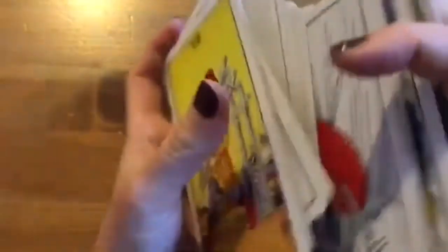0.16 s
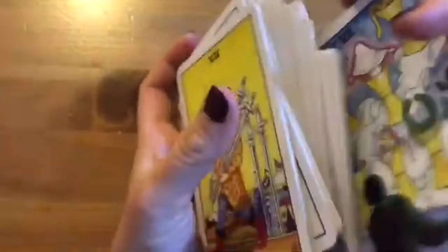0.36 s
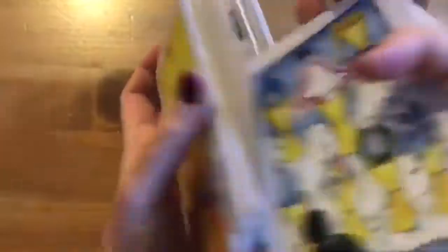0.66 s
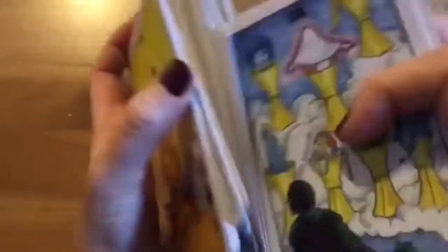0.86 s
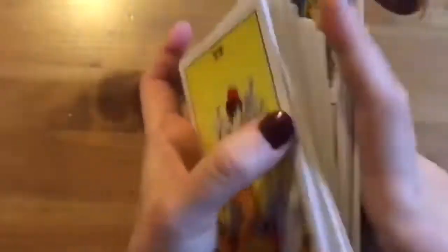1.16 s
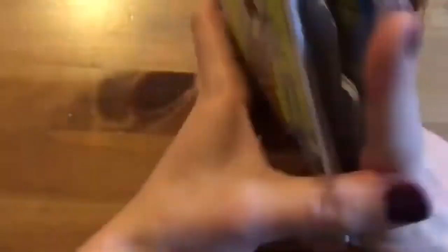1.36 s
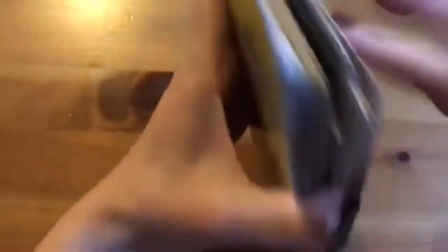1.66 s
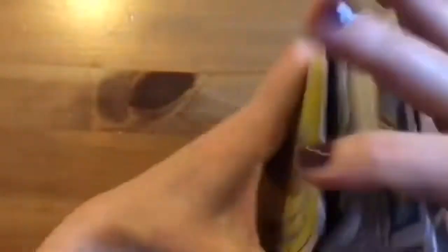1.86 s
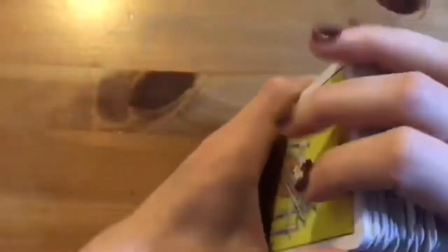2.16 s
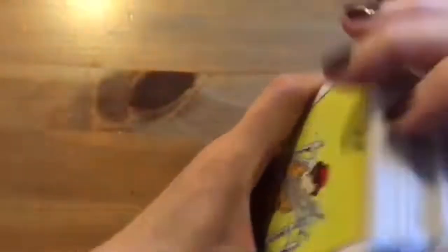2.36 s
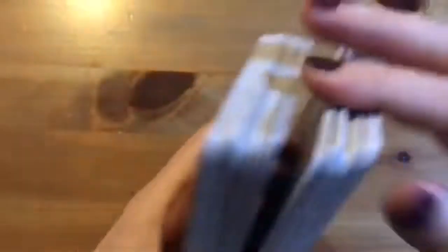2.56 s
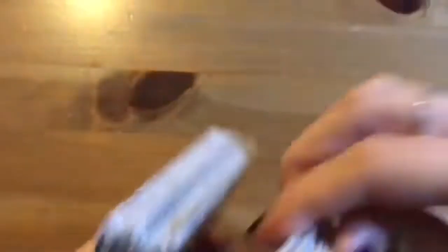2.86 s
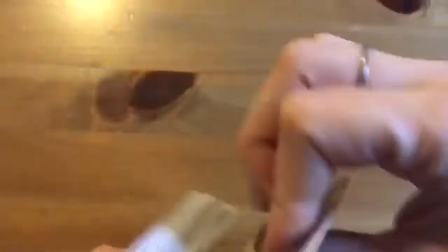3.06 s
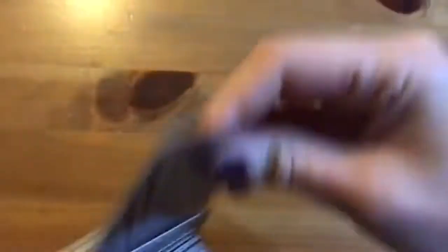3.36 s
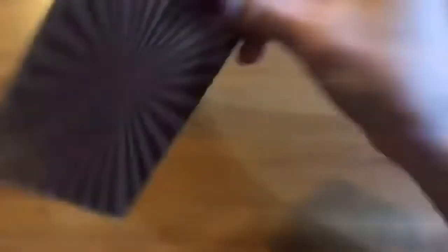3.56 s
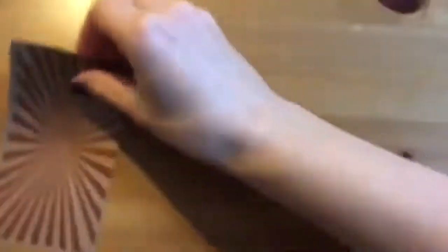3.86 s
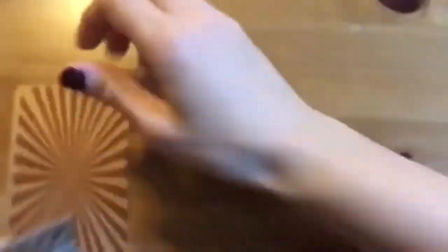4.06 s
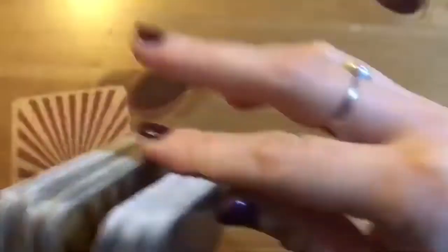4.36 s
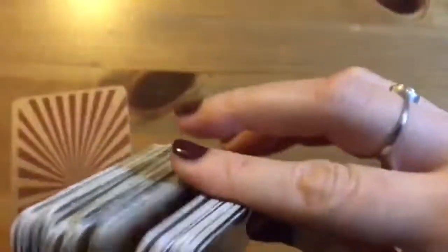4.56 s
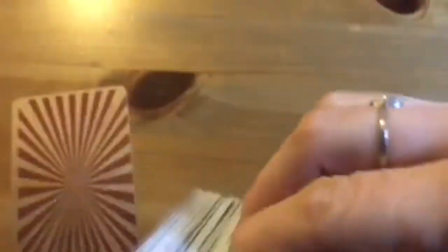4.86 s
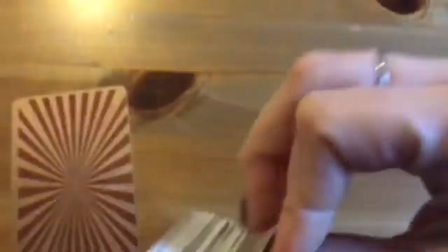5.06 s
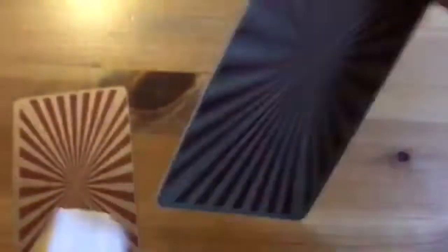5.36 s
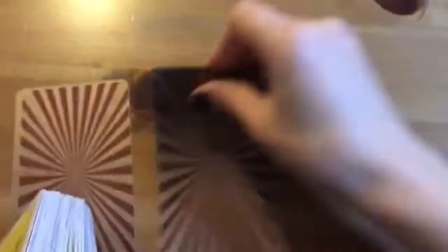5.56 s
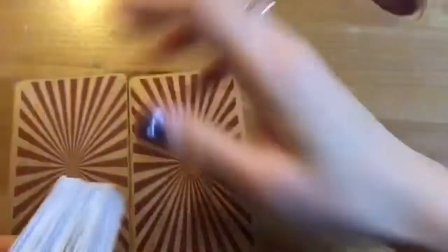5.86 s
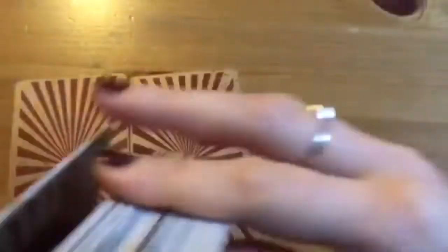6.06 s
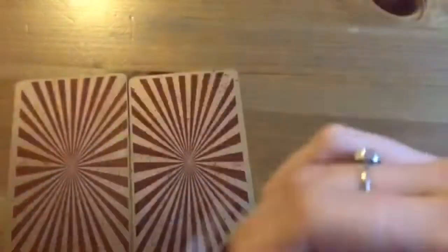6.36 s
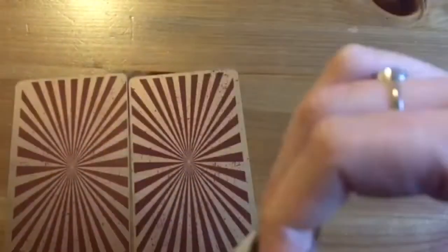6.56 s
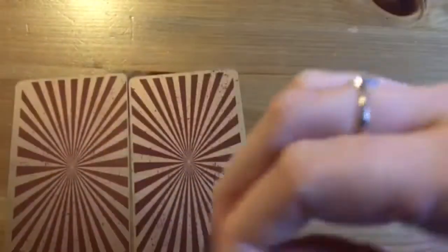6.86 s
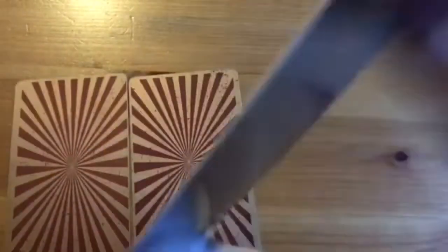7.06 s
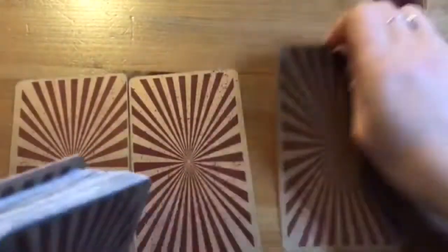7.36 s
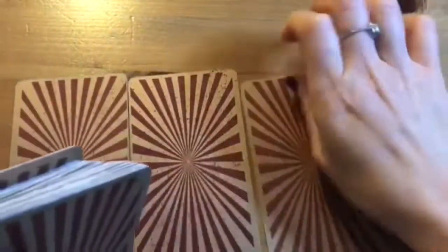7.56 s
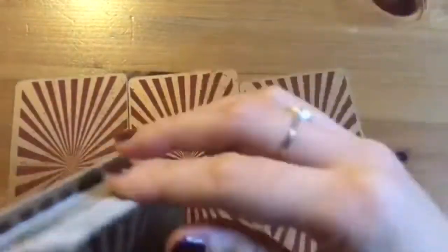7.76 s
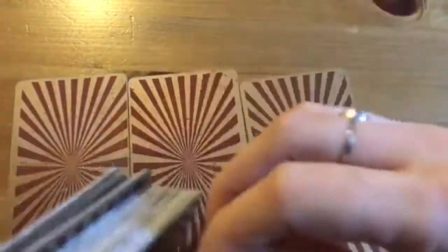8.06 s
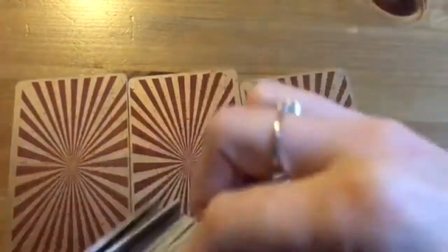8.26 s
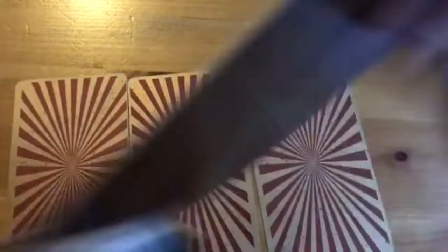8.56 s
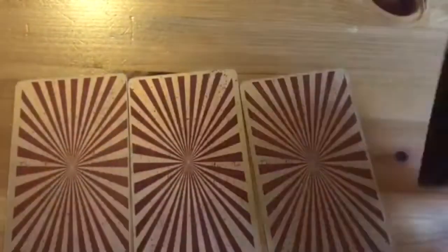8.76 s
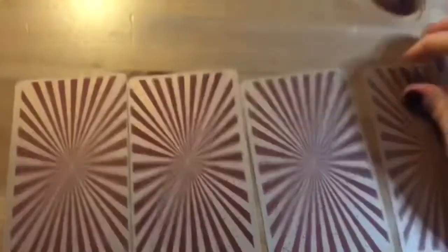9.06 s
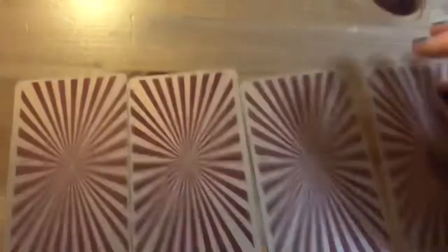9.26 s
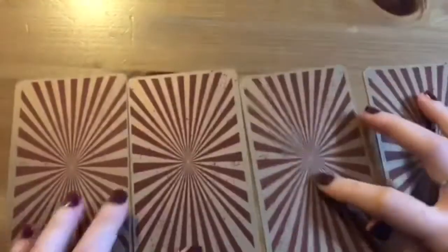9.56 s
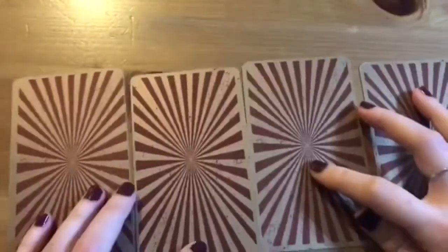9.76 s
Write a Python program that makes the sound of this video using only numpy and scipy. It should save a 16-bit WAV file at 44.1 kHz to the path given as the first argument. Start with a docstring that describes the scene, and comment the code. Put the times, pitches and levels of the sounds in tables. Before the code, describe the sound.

Very close to the microphone in a quiet, fairly live room, a deck of large cards is shuffled by hand: hissing friction, loose rustles, sharp flicks and small clicks. The deck is knocked hard on a wooden table in three quick blows. Then four cards are dealt one by one, each landing with a light tap and pressed down with a snap or dull slap, with faint sliding between.

```python
"""A quiet, fairly live room, a wooden table, and a deck of large cards close to the microphone.
The deck is shuffled overhand with hissing friction bursts, rustles and clicks, then knocked square.
Later four cards land edge first and are snapped flat; two are heard being drawn with a soft, low rub.
Blows are damped pressure swings plus ringing table modes; cards are noise grains through resonances.
Blows and flicks feed a decaying noise tail; hiss, rustle, ticks, puffs and table sway stay dry and near."""
import sys
import numpy as np
from scipy import signal
from scipy.fft import rfft, irfft
from scipy.io import wavfile

SR = 44100
rng = np.random.default_rng(int(sys.argv[2]) if len(sys.argv) > 2 else 0)


def to_wav(s):
    """Save 16-bit WAV."""
    ch = np.atleast_2d(s).T  # columns
    pcm = np.round(np.clip(ch, -1, 1) * 32767)  # PCM
    wavfile.write(sys.argv[1], SR, pcm.astype(np.int16))


N = 436590
BLOW_S = .012  # reference length for the level of every short sound


def from_db(db):
    """Amplitude factor of a level in dB."""
    return 10 ** (np.asarray(db) / 20)


def rms_one(x):
    """Scale to an rms of 1."""
    return x / np.sqrt(np.mean(x ** 2) + 1e-20)


def at_level(x, db):
    """Scale a short sound to the energy that the level would have over one blow's length."""
    return from_db(db) * x * np.sqrt(BLOW_S * SR / (np.sum(x ** 2) + 1e-20))


def add(track, s, x):
    """Mix a short sound in at a time in seconds."""
    start = int(round(s * SR))
    x = x[max(-start, 0):N - start]
    start = max(start, 0)
    track[start:start + len(x)] += x


def level_curve(rows):
    """Gain in time from rows of (t/s, level/dB); practically silent after the last row."""
    s, db = np.transpose(rows)
    return from_db(np.interp(np.arange(N) / SR, s, db, right=-120))


def colour(x, points):
    """Give a steady sound a spectrum, interpolated over log frequency; rms 1."""
    hz, db = np.transpose(points)
    bins = np.maximum(np.arange(N // 2 + 1) * SR / N, 1)
    gain = from_db(np.interp(np.log(bins), np.log(hz), db))
    return rms_one(irfft(rfft(x) * gain, N))


def cut(x, hz, kind, order=2):
    """Butterworth low, high or band pass."""
    sos = signal.butter(order, np.clip(hz, 10, .45 * SR), kind, fs=SR, output="sos")
    return signal.sosfilt(sos, x)


def resonate(x, hz, width_hz):
    """A resonance with gain 1 on top."""
    r = np.exp(-np.pi * width_hz / SR)
    zeros = np.array([1, 0, -1]) * (1 - r * r) / 2
    poles = [1, -2 * r * np.cos(2 * np.pi * hz / SR), r * r]
    return signal.lfilter(zeros, poles, x)


def grains(size, spread_db):
    """Paper fibres catch and let go: dense tiny clicks of very unequal strength."""
    boost = np.minimum(rng.exponential(1, size), 5)
    return rms_one(rng.standard_normal(size) * from_db(spread_db * boost))


def flutter(rate_hz, depth_db):
    """Uneven finger pressure, as a gain."""
    return from_db(depth_db * rms_one(cut(rng.standard_normal(N), rate_hz, "low")))


def stroke_speed(size):
    """A hand movement speeds up and slows down: half a sine."""
    return np.sin(np.linspace(0, np.pi, size)).clip(0)


# the still room: f/Hz, relative level per Hz/dB
AIR_SPECTRUM = [(20, -3.5), (45, 0), (75, -6.5), (112, 4), (160, -3.5), (240, -7.5), (370, -12.5),
                (700, -14), (1200, -19), (3000, -22.5), (15000, -26)]


def ambience(level_db=-62.5):
    """The still room: steady noise, strongest in the bass."""
    return from_db(level_db) * colour(rng.standard_normal(N), AIR_SPECTRUM)


# the deck shifting in the hand: t/s, hiss level before the grip gain/dB
GRIP_HISS = [(0, -60.5), (.5, -58.5), (.95, -57), (1.75, -64), (2.3, -66.5), (3.0, -63.5), (3.25, -66),
             (4.0, -58), (4.74, -66), (5.2, -63), (5.73, -56), (6.05, -60), (6.55, -61.5), (6.92, -69),
             (7.5, -62), (8.4, -65.5), (9.07, -55.5), (9.9, -65.5)]
# card slides over card or over the wood: start t/s, end t/s, level/dB, singing edge f/Hz
STROKES = [(.073, .131, -52, 9100), (.207, .27, -60.5, 5300), (1.02, 1.175, -70, 13000),
           (1.229, 1.417, -55, 12300), (1.475, 1.594, -54.5, 13000), (1.887, 1.982, -57.5, 11100),
           (2.047, 2.2, -59.5, 10500), (2.337, 2.43, -56.5, 11000), (2.468, 2.573, -57, 11200),
           (2.86, 2.977, -71, 5440), (3.345, 3.482, -65.5, 10100), (4.0, 4.2, -58, 11500),
           (4.387, 4.483, -54.5, 5600), (4.987, 5.04, -56, 5740), (6.272, 6.38, -71, 13900),
           (7.03, 7.17, -63, 6640), (7.167, 7.26, -62.5, 10130), (7.872, 8.05, -72, 9900),
           (8.092, 8.167, -59, 10300), (8.27, 8.395, -64, 6600), (9.068, 9.285, -64, 6700),
           (9.568, 9.66, -59.5, 10200)]
SKID_DELAY_S, SKID_S, SKID_DB, SKID_HZ = .006, .19, -68, 6600
SLIPS_PER_S, SLIP_S = 4, .073
SLIP_DB = -3  # relative to GRIP_HISS
SLIP_LOW_HZ, SLIP_HIGH_HZ = 5400, 11000


def skids():
    """After landing, and again after the snap, a card skids over the wood: rows like STROKES."""
    rows = []
    for s, *rest in LANDINGS + SNAPS:
        start = s + SKID_DELAY_S
        rows.append((start, start + SKID_S, SKID_DB, SKID_HZ))
    return rows


def finger_slips():
    """Fingers keep adjusting the cards in small chance slips: rows like STROKES."""
    rows = []
    for k, (when, length, pitch) in enumerate(rng.random((100, 3))):
        start = (k + when) / SLIPS_PER_S
        end = start + SLIP_S * (.5 + length)
        if end < N / SR:
            db = np.interp(start, *np.transpose(GRIP_HISS)) + SLIP_DB
            rows.append((start, end, db, np.interp(pitch, [0, 1], [SLIP_LOW_HZ, SLIP_HIGH_HZ])))
    return rows


# colour of the sliding hiss: f/Hz, relative level per Hz/dB
HISS_SPECTRUM = [(300, -34), (1400, -17), (2600, -14.5), (3700, -14), (4400, -6), (5000, -6.5),
                 (5400, -1.5), (5950, -5), (6600, -2), (7900, -7.5), (10000, 0.5), (11000, -1.5),
                 (13000, -2), (15000, -2)]


def sliding(sing_width_hz=650, sing_db=1.0, grip_db=-1.5):
    """Each stroke hisses and its edge sings; between strokes the gripped deck shifts faintly."""
    hiss = colour(grains(N, spread_db=3.5), HISS_SPECTRUM) * flutter(rate_hz=45, depth_db=1.64)
    out = from_db(grip_db) * level_curve(GRIP_HISS) * hiss
    for start, end, db, sing_hz in STROKES + skids() + finger_slips():
        rub = hiss[int(start * SR):int(max(end, start + BLOW_S) * SR)]
        singing = from_db(sing_db) * resonate(rub, sing_hz, sing_width_hz)
        add(out, start, from_db(db) * np.sqrt(stroke_speed(len(rub))) * rms_one(rub + singing))
    return out


# a flexing card face: f/Hz, width/Hz, relative level/dB
FACE_MODES = [(680, 260, 1), (1260, 446, 4.5), (2070, 580, 0.5), (2690, 1040, -6.5)]


def card_face(x):
    """The broad, quickly damped resonances of a bending card, with alternating sign."""
    out = 0
    for k, (hz, width_hz, db) in enumerate(FACE_MODES):
        out = out + (-1) ** k * from_db(db) * resonate(x, hz, width_hz)
    return out


# loose cards tumbling during the shuffle: t/s, rustle level/dB
TUMBLE = [(0, -78), (.17, -80), (.33, -73), (.6, -60), (.9, -59.5), (1.17, -69), (1.8, -64.5), (2.5, -69.5)]
# a packet or single card drops and settles: t/s of the peak, level/dB, time to fall by 60 dB/s
RUSTLES = [(.06, -56, 0.88), (.24, -57.5, 0.14), (1.04, -59, 0.12), (1.295, -57, 0.82), (1.55, -55.5, 0.24),
           (3.88, -64, .3), (5.535, -57, 0.086), (5.76, -52, 0.48), (7.115, -58, 0.18), (7.45, -55, 0.096),
           (8.585, -55, 0.19), (9.045, -50.5, 0.17), (9.11, -61, 1)]


def rustle_gain(attack_s=.022):
    """The tumble of the shuffle plus a quick swell and a decay for each drop, summed as power."""
    power = level_curve(TUMBLE) ** 2
    t = np.arange(SR) / SR - attack_s
    for s, db, t60 in RUSTLES:
        swell = np.minimum(1 + t / attack_s, from_db(-60 * t / t60))
        add(power, s - attack_s, (from_db(db) * swell) ** 2)
    return np.sqrt(power)


def shuffling(packet_db=8.0):
    """Loose cards flex and rustle as they drop onto the packet or settle on the wood."""
    loose = grains(N, spread_db=3.5) * flutter(rate_hz=31, depth_db=4.5)
    packet = from_db(packet_db) * resonate(loose, 322, 300)
    return rustle_gain() * rms_one(card_face(loose) + packet)


def bright_ticks(per_s=9.0, tick_db=-65.0, spread_db=5.0, length_s=.0015, size=512):
    """A faint, irregular patter of tiny, very bright ticks, about nine a second."""
    out, t = np.zeros(N), np.arange(size) / SR
    chances = rng.random((300, 3))
    times = np.cumsum(-np.log(1 - chances[:, 0]) / per_s)  # independent random gaps
    for s, (gap, strength, pitch) in zip(times, chances):
        burst = rng.standard_normal(size) * np.exp(-t / length_s)
        if s < N / SR:
            tick = resonate(burst, np.interp(pitch, [0, 1], [10000, 14500]), 2500)
            add(out, s, at_level(tick, tick_db + spread_db * (2 * strength - 1)))
    return out


def shuffle_clicks(per_s=7, click_db=-63, spread_db=2, half_s=.00082, click_hz=8600, face_db=-2):
    """Single cards click together by chance until the deck is knocked square: rows like FLICKS."""
    rows = []
    for k, (when, strength) in enumerate(rng.random((40, 2))):
        s = (k + when) / per_s
        db = click_db + spread_db * (2 * strength - 1)
        if s < KNOCKS[0][0]:
            rows.append((s, db, half_s, click_hz, db + face_db))
    return rows


# a card's edge flicks or scuffs over another:
# t/s, level/dB, half length (Gaussian sigma)/s, edge f/Hz, flexing face level/dB
FLICKS = [(.0384, -41, 0.0033, 6600, -42.5), (.103, -58, 0.011, 7800, -48),
          (.6085, -57, 0.00093, 8950, -60), (.6188, -45.5, 0.0011, 5160, -48),
          (.757, -52, 0.00058, 9200, -58), (.84, -52, .001, 8600, -63), (1.527, -44, 0.0041, 5600, -65),
          (1.673, -56, 0.0014, 6230, -71), (1.8808, -49, 0.0012, 4400, -42),
          (2.103, -52, 0.0063, 10500, -76), (3.02, -61, .0016, 9000, -73),
          (3.504, -52.5, 0.0037, 9900, -53.5), (4.195, -59.5, 0.00042, 9300, -85),
          (5.521, -52.5, 0.0051, 7700, -47), (6.186, -57.5, 0.00061, 10800, -82),
          (6.361, -61, 0.0013, 13800, -78), (7.064, -58.5, 0.0027, 6530, -66),
          (7.802, -58.5, 0.0013, 12000, -86), (8.19, -58.5, 0.0061, 2500, -65),
          (8.474, -64, .0016, 14200, -79), (8.585, -44, .012, 7340, -52.5), (8.991, -52, 0.0011, 8400, -67),
          (9.129, -53, 0.0091, 3730, -61), (9.214, -54.5, 0.0064, 6740, -55.5)]


def edge_flicks(edge_width_hz=2200, sheen_db=-9):
    """A burst of friction swells and stops as the edge slips free; edge and face both ring."""
    out = np.zeros(N)
    for s, db, half_s, edge_hz, face_db in FLICKS + shuffle_clicks() + landing_ticks() + snap_edges():
        lead_s = 4 * half_s + .005
        t = np.arange(-lead_s, lead_s, 1 / SR)
        slip = grains(len(t), spread_db=0.1) * np.exp(-(t / half_s) ** 2 / 2)
        sheen = cut(cut(slip, 6900, "high"), 10700, "low")
        edge = resonate(slip, edge_hz, edge_width_hz) + from_db(sheen_db) * sheen
        add(out, s - lead_s, at_level(edge, db) + at_level(card_face(slip), face_db))
    return out


# the wooden top under the cards: f/Hz, relative level before scatter/dB, time to fall by 60 dB/s
TABLE_MODES = [(141, -9, 0.19), (225, -19, 0.11), (275.5, -10.5, 0.12), (342, 1, 0.027), (473, -1.5, 0.057),
               (556, -9.5, 0.052), (656, -9, 0.066), (703, -11, 0.11), (793, -9, 0.073), (967, -3, 0.019),
               (1125, -11, 0.044), (1263, -11, 0.052), (1444, -11.5, 0.032), (1930, -2, 0.022),
               (2470, -12, 0.075)]


def strike(pitch_hz, damping, wood_db, top_hz, scatter_db, size=8192):
    """One contact: a pressure swing of about a cycle, then table modes, struck differently each time."""
    t = np.arange(size) / SR
    swing = resonate(signal.unit_impulse(size), pitch_hz, damping * pitch_hz)
    swing = cut(swing, top_hz, "low", order=4)
    wood = np.zeros(size)
    for hz, db, t60 in TABLE_MODES:
        strength = from_db(db + scatter_db * rng.normal()) * rng.choice([-1, 1])
        wood += strength * np.sin(2 * np.pi * hz * t) * from_db(-60 * t / t60)
    ringing = signal.fftconvolve(swing, wood)[:size]
    return at_level(swing, 0) + at_level(ringing, wood_db)


# a card or a finger strikes the deck or the table:
# t/s, level/dB, contact f/Hz, puff of trapped air level/dB
TAPS = [(.037, -44.5, 1940, -56), (.389, -63.5, 1030, -73), (.46, -62, 1070, -72), (.595, -56.5, 1200, -77),
        (.6178, -49.5, 1680, -70), (.748, -58, 1250, -77), (.837, -55, 770, -85), (.935, -57, 960, -68),
        (1.279, -50.5, 910, -76), (1.523, -50.5, 770, -54.5), (4.224, -60.5, 610, -85),
        (5.5125, -40, 735, -52), (6.43, -64, 1200, -88), (6.6046, -53, 1070, -82), (7.122, -58, 485, -75),
        (7.366, -54, 1300, -78), (7.452, -52, 506, -53), (8.216, -62, 835, -80), (8.228, -57, 617, -82),
        (8.611, -51.5, 500, -49.5), (9.2244, -49, 920, -36.5)]


def contacts():
    """Single taps, and for each dealt card its landing, flop and slap: rows like TAPS."""
    return TAPS + landing_contacts() + snap_slaps()


def card_taps(softness=2.38):
    """A light card slaps down: mostly its own pressure swing, duller the slower the contact."""
    out = np.zeros(N)
    for s, db, pitch_hz, puff_db in contacts():
        top_hz = min(softness * pitch_hz, 2500)
        blow = strike(pitch_hz, damping=0.84, wood_db=-1.0, top_hz=top_hz, scatter_db=2.7)
        add(out, s, at_level(blow, db))
    return out


def air_puffs(puff_hz=85, puff_width_hz=230, size=4096):
    """Air squeezed from under a card is heard only close by and does not reach the room."""
    out = np.zeros(N)
    puff = cut(resonate(signal.unit_impulse(size), puff_hz, puff_width_hz), 213, "low")
    for s, db, pitch_hz, puff_db in contacts():
        add(out, s, at_level(puff, puff_db))
    return out


# reverberation: f/Hz, band level/dB, time to fall by 60 dB/s
ROOM_BANDS = [(60, -25, 0.53), (145, 2.5, 0.58), (400, -9.5, 0.73), (920, -7, 0.62), (1570, -9, 0.76),
              (3040, -5, 0.41), (6040, -16, 0.62), (14000, -7, 0.12)]


def room(x, onset_s=.00078):
    """A diffuse tail of noise in which each band dies at its own rate."""
    t = np.arange(SR) / SR
    hz, db, t60 = np.transpose(ROOM_BANDS)
    edges = np.geomspace(40, 16000, 14)
    tail = np.zeros(SR)
    for low, high in zip(edges, edges[1:]):
        centre = np.log(low * high) / 2  # log of the band's middle frequency
        fade = from_db(-60 * t / np.interp(centre, np.log(hz), t60))
        band = cut(rng.standard_normal(SR), [low, high], "band") * fade * (1 - np.exp(-t / onset_s))
        band *= np.sqrt(2 * (high - low) / SR / np.sum(band ** 2))  # energy in step with bandwidth
        tail += from_db(np.interp(centre, np.log(hz), db)) * band
    return signal.fftconvolve(x, tail)[:N]


# the deck is knocked on the table three times, each time on two corners:
# t/s, level/dB, contact f/Hz
KNOCKS = [(1.804, -40, 735), (1.807, -33, 920), (1.875, -32, 1010), (1.88, -29, 1340), (1.8982, -24, 755),
          (1.901, -32.5, 950)]


def settling(count=6, first_s=.0164, slowing=1.69, first_db=-39.5, loss_db=2, pitch_hz=810, octaves=.25):
    """Loose packets drop into line after the last knock, ever later and weaker: rows like KNOCKS."""
    rows = []
    for k in range(count):
        s = KNOCKS[-1][0] + first_s * slowing ** k
        rows.append((s, first_db - loss_db * k, pitch_hz * 2 ** (octaves * rng.normal())))
    return rows


def deck_knocks(thump_db=-19, size=4096):
    """The heavy deck drives the wood hard, with a low thump and little treble."""
    out = np.zeros(N)
    thump = cut(resonate(signal.unit_impulse(size), 130, 99), 252, "low")
    for s, db, pitch_hz in KNOCKS + settling():
        blow = strike(pitch_hz, damping=0.67, wood_db=2.5, top_hz=2120, scatter_db=2.0)
        add(out, s, at_level(blow, db))
        add(out, s, at_level(thump, db + thump_db))
    return out


# the hand's weight comes down on the table: t/s, thud level/dB, sway level/dB
PRESSES = [(1.898, -41.5, -53), (3.9421, -52, -66), (5.325, -56, -71), (5.512, -70, -50), (5.753, -47, -65),
           (7.452, -49, -70), (7.491, -48, -58), (9.019, -65, -43), (9.2234, -41.5, -35.5)]


def table_thuds(pad_hz=280):
    """A soft push drives mainly the low modes of the whole table top."""
    out = np.zeros(N)
    for s, db, sway_db in PRESSES:
        push = strike(pad_hz, damping=1.15, wood_db=6.0, top_hz=854, scatter_db=4.5)
        add(out, s, at_level(push, db))
    return out


def table_sway(size=16384):
    """The table rocks on its legs with a brief deep wobble."""
    out, push = np.zeros(N), signal.unit_impulse(size)
    wobble = resonate(push, 33.7, 7.1) + from_db(-9.5) * resonate(push, 58, 6.6)
    wobble = cut(wobble, 120, "low")
    for s, thud_db, db in PRESSES:
        add(out, s, at_level(wobble, db))
    return out


# a card is drawn slowly out of the deck: start t/s, end t/s, level/dB
DRAWS = [(3.119, 3.603, -70), (6.2, 6.62, -70.5)]


def drawing(rub_hz=680, rub_width_hz=520):
    """The deck presses on the card that is pulled out and muffles its friction."""
    out = np.zeros(N)
    for start, end, db in DRAWS:
        rub = grains(int((end - start) * SR), spread_db=6.5)
        for _ in range(2):
            rub = resonate(rub, rub_hz, rub_width_hz)
        add(out, start, from_db(db) * np.sqrt(stroke_speed(len(rub))) * rms_one(rub))
    return out


# a dealt card lands edge first: t/s, level/dB, contact f/Hz, delay until its body flops down/s,
# flop level/dB, puff of trapped air level/dB, edge tick level/dB, flexing face level/dB
LANDINGS = [(3.6722, -48.5, 960, .004, -45.5, -64, -50, -46.5),
            (5.3239, -37.5, 1040, 0.00059, -37.5, -45, -49.5, -56),
            (7.3393, -40, 1150, .003, -44.5, -60, -52, -52),
            (8.8302, -33.5, 740, 0.0025, -48, -51, -43, -42.5)]


def landing_contacts(flop_hz=416):
    """The edge hits, then the flat body flops down and sounds lower: rows like TAPS."""
    rows = []
    for s, db, pitch_hz, flop_s, flop_db, puff_db, tick_db, face_db in LANDINGS:
        rows += [(s, db, pitch_hz, puff_db), (s + flop_s, flop_db, flop_hz, -np.inf)]
    return rows


def landing_ticks(half_s=.0009, tick_hz=5300):
    """The landing edge ticks and the face flexes: rows like FLICKS."""
    return [(s, tick_db, half_s, tick_hz, face_db) for s, *contact, tick_db, face_db in LANDINGS]


# the card's bent corner is let go and slaps flat: t/s, crack level/dB, flexing face level/dB,
# delay of the slap/s, slap level/dB, slap f/Hz, puff level/dB
SNAPS = [(3.933, -42, -46.5, 0.0071, -42, 383, -50.5), (5.7509, -36.5, -44.5, 0.00058, -40, 550, -47),
         (7.489, -43, -49, 0.00055, -40.5, 470, -45), (9.001, -52, -53, 0.017, -46.5, 806, -47)]
CRACK_HALF_S, CRACK_HZ = .002, 6700
SLAP_TICK_DB, SLAP_TICK_HALF_S, SLAP_TICK_HZ = -47, .0012, 12200
SCRAPE_LEAD_S, SCRAPE_HALF_S, SCRAPE_DB, SCRAPE_FACE_DB = .008, .004, -64.5, -52


def snap_edges():
    """The corner scrapes off the thumb and cracks, with a very bright tick as it slaps flat."""
    rows = []  # like FLICKS
    for s, crack_db, face_db, delay_s, *slap in SNAPS:
        rows.append((s - SCRAPE_LEAD_S, SCRAPE_DB, SCRAPE_HALF_S, CRACK_HZ, SCRAPE_FACE_DB))
        rows.append((s, crack_db, CRACK_HALF_S, CRACK_HZ, face_db))
        rows.append((s + delay_s, SLAP_TICK_DB, SLAP_TICK_HALF_S, SLAP_TICK_HZ, -np.inf))
    return rows


def snap_slaps():
    """The released corner slaps the wood and squeezes out air: rows like TAPS."""
    rows = []
    for s, crack_db, face_db, delay_s, slap_db, pitch_hz, puff_db in SNAPS:
        rows.append((s + delay_s, slap_db, pitch_hz, puff_db))
    return rows


def scene():
    """Blows and flicks excite the room, each to its own degree; the small near sounds stay dry."""
    near = sliding() + shuffling() + bright_ticks() + air_puffs() + table_sway() + drawing()
    flicks, taps, knocks, thuds = edge_flicks(), card_taps(), deck_knocks(), table_thuds()
    send = from_db(4.5) * flicks + from_db(-3.5) * taps
    send += from_db(2.0) * knocks + from_db(6.5) * thuds
    return (ambience() + near + flicks + taps + knocks + thuds + room(send))[None]


def record(dry, cutoff_hz=15200):
    """The top end is cut steeply."""
    return signal.sosfilt(signal.ellip(12, .1, 80, cutoff_hz, fs=SR, output="sos"), dry)


dry = scene()
out = record(dry)
to_wav(out)
```